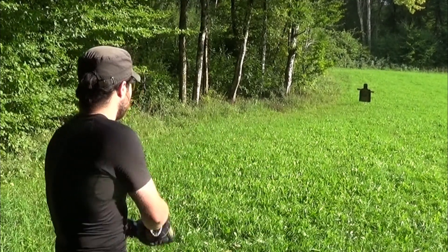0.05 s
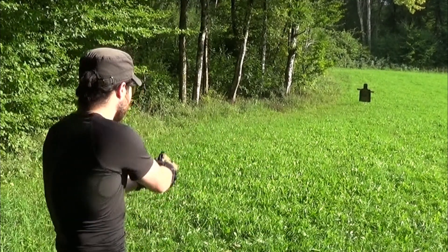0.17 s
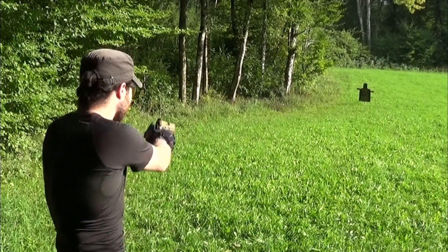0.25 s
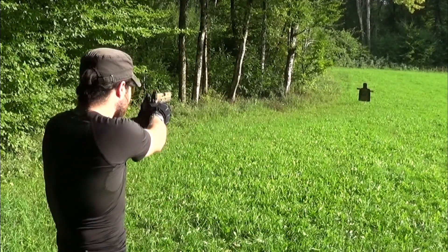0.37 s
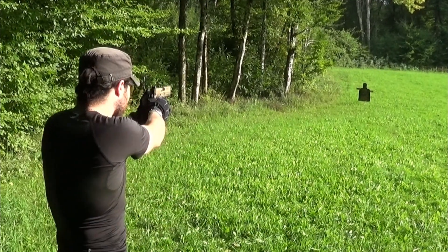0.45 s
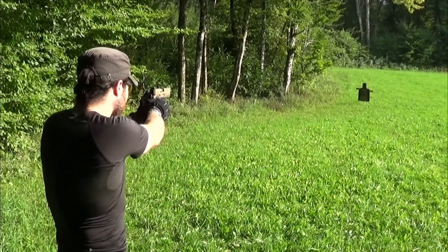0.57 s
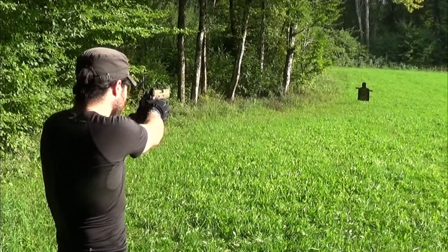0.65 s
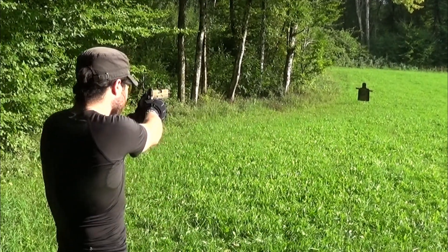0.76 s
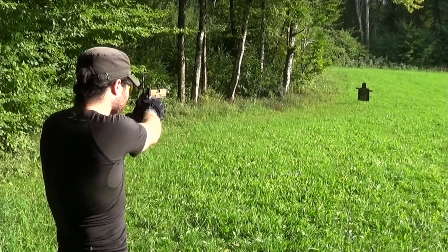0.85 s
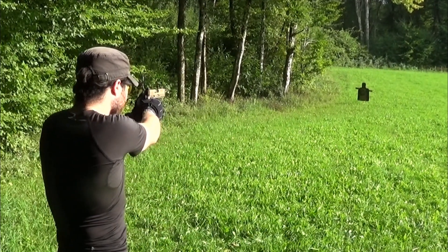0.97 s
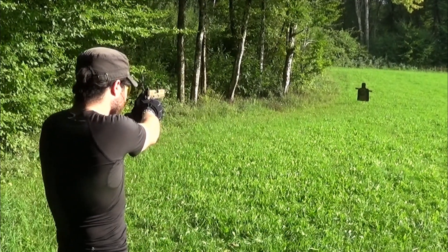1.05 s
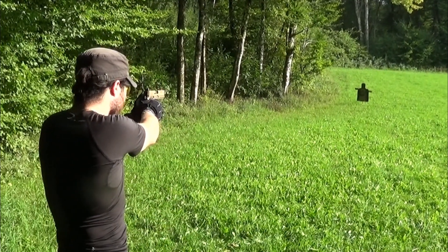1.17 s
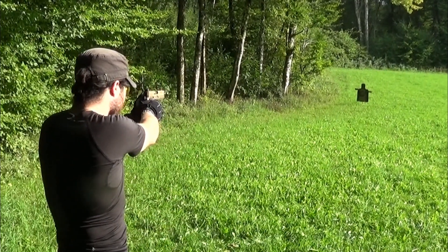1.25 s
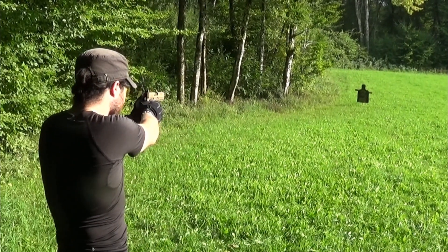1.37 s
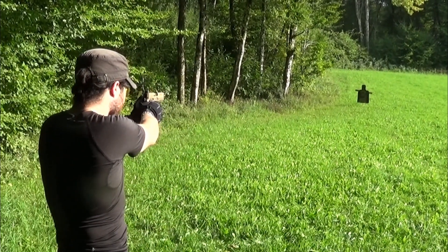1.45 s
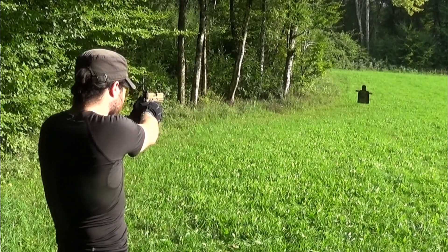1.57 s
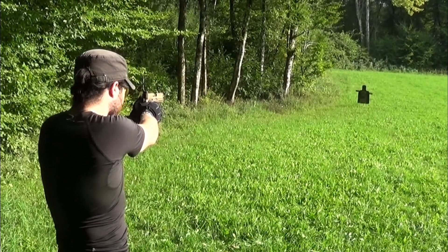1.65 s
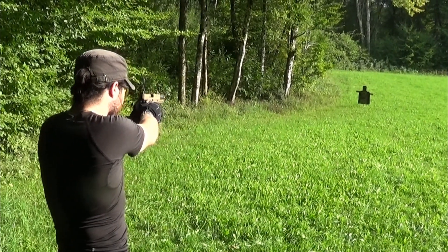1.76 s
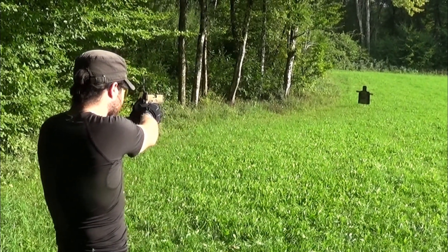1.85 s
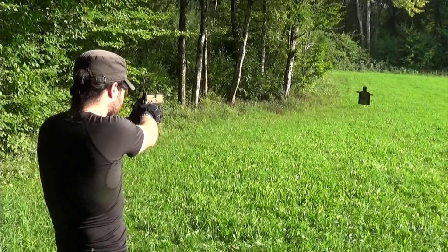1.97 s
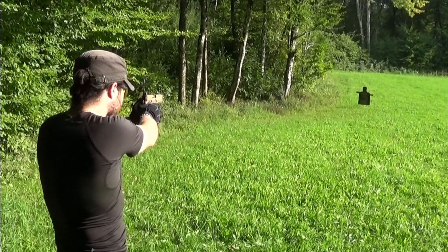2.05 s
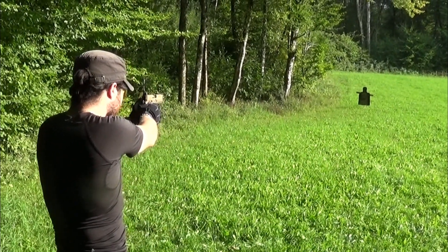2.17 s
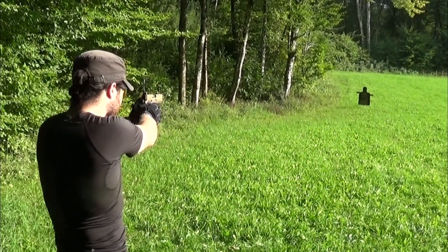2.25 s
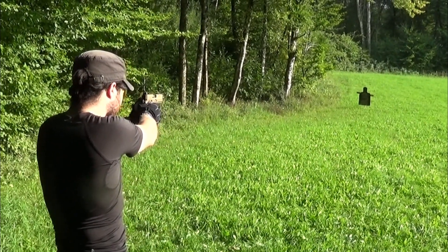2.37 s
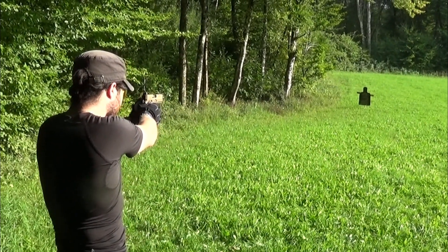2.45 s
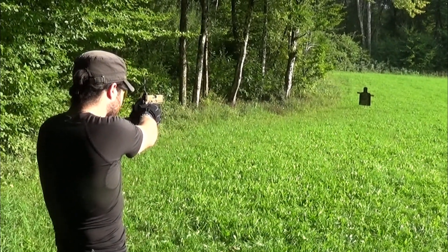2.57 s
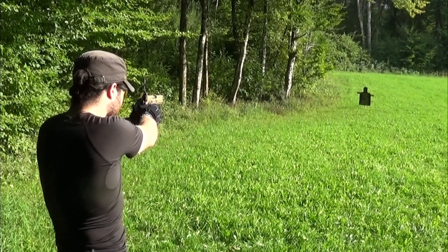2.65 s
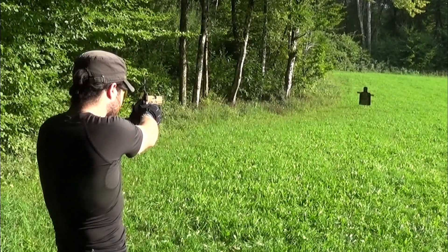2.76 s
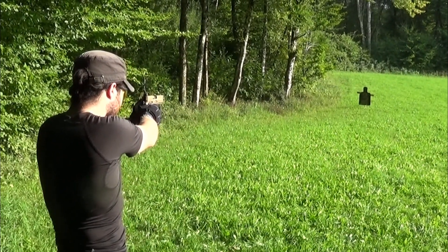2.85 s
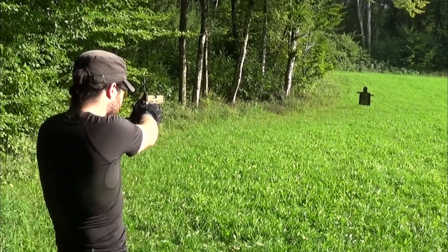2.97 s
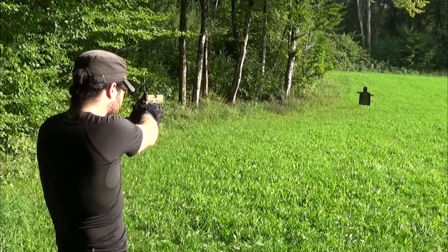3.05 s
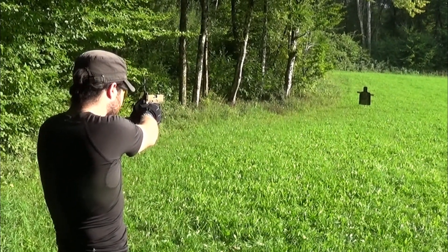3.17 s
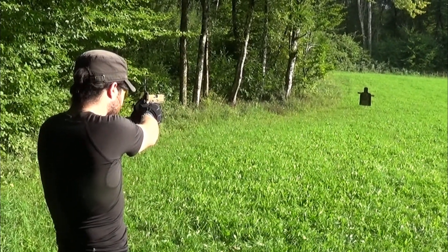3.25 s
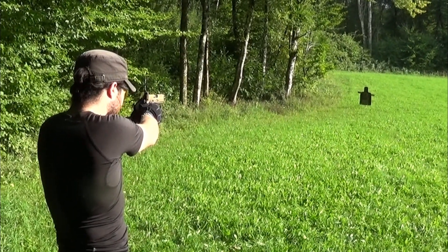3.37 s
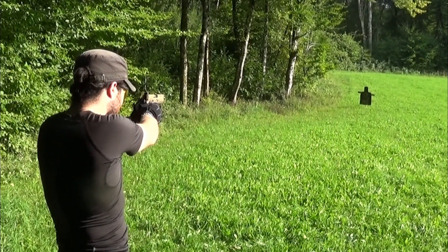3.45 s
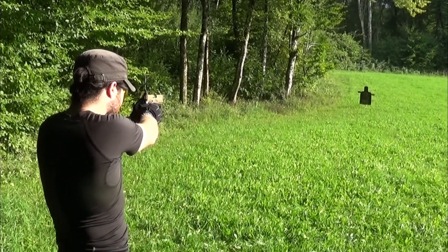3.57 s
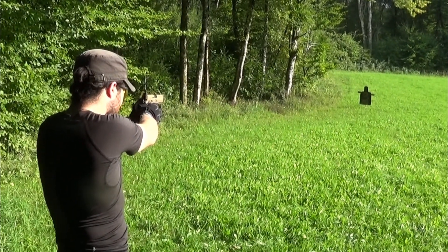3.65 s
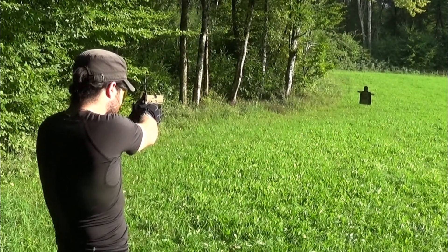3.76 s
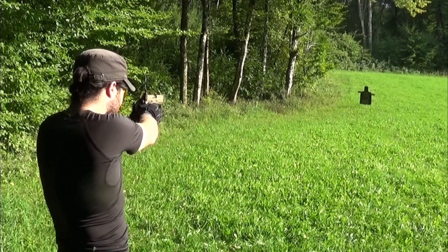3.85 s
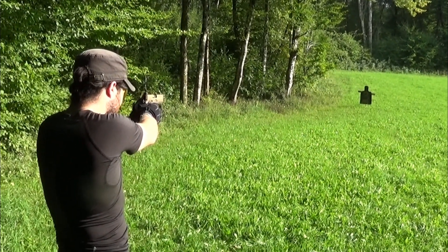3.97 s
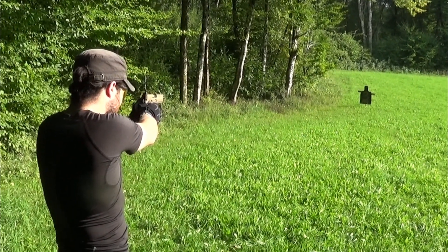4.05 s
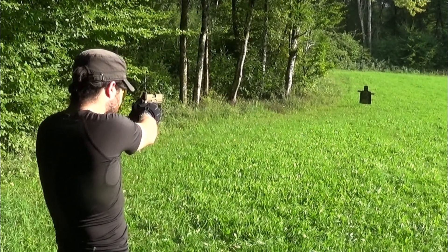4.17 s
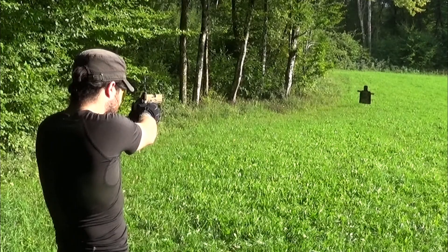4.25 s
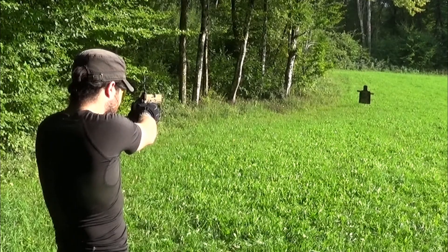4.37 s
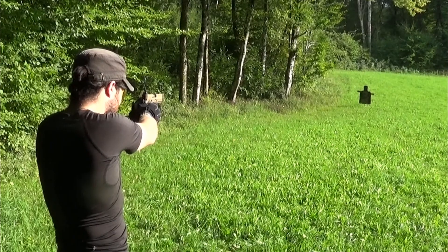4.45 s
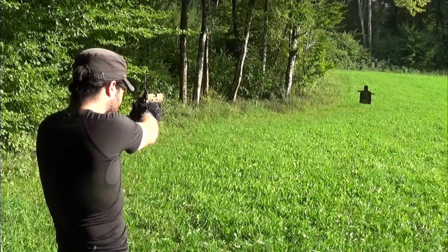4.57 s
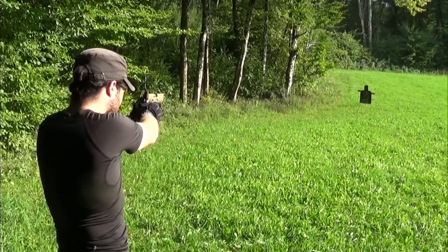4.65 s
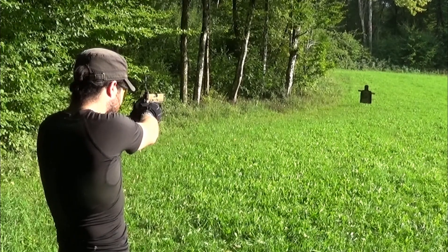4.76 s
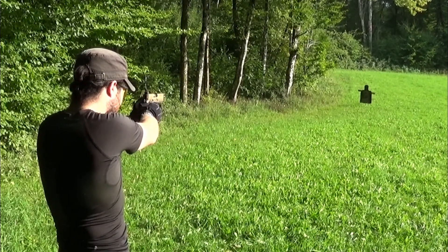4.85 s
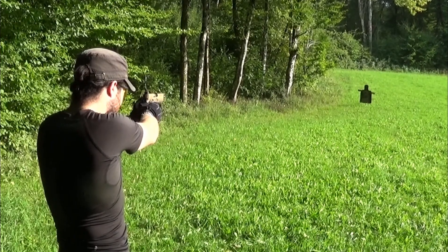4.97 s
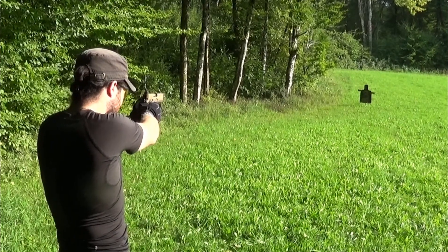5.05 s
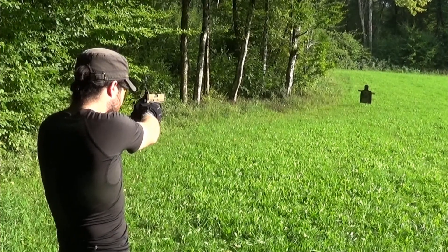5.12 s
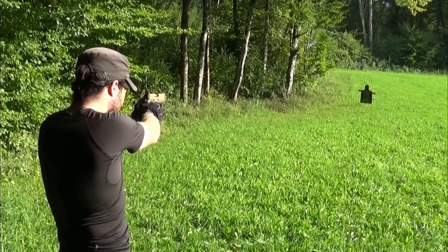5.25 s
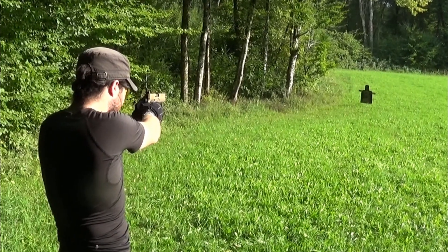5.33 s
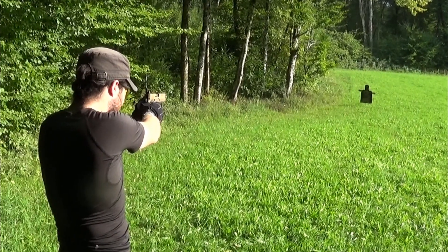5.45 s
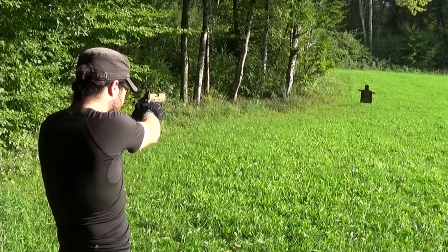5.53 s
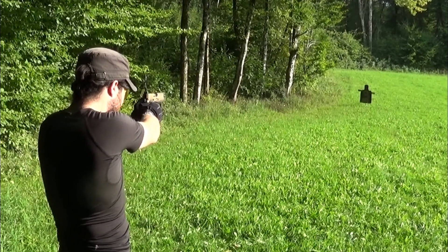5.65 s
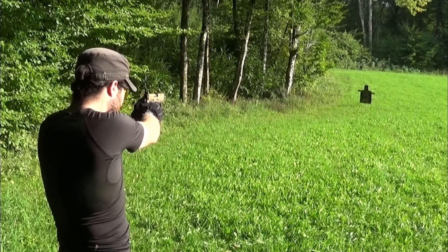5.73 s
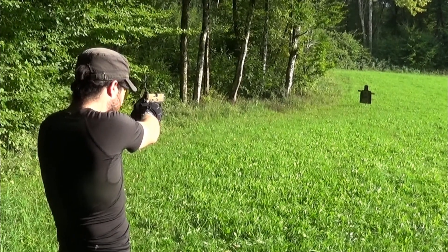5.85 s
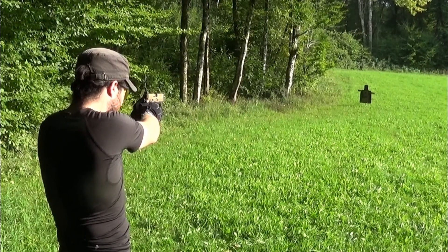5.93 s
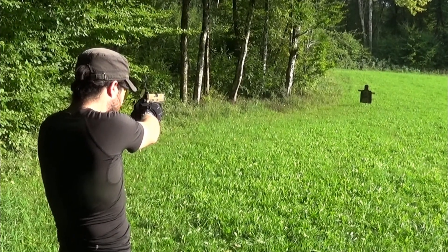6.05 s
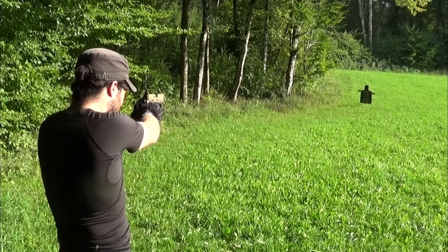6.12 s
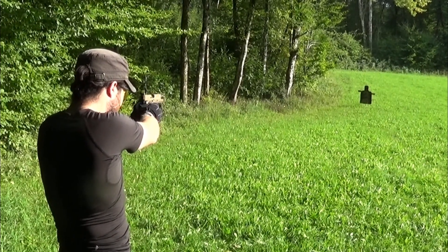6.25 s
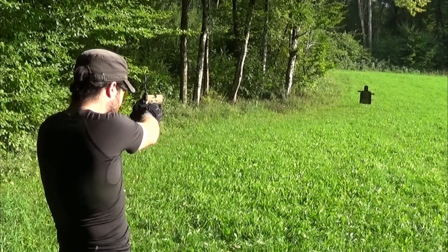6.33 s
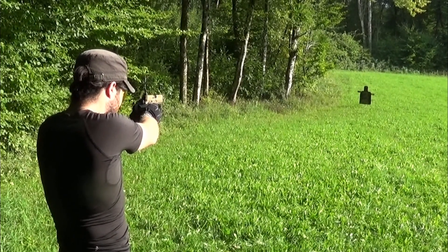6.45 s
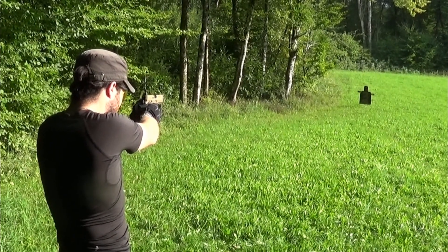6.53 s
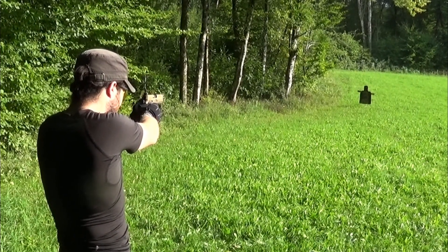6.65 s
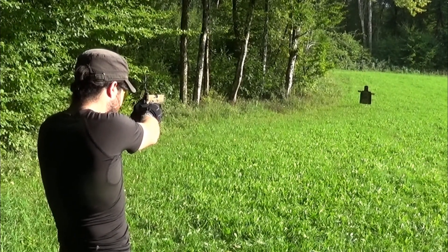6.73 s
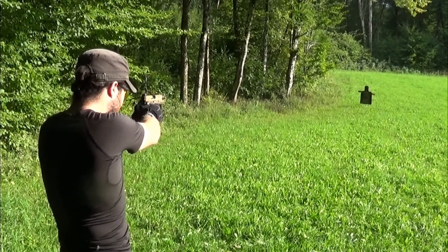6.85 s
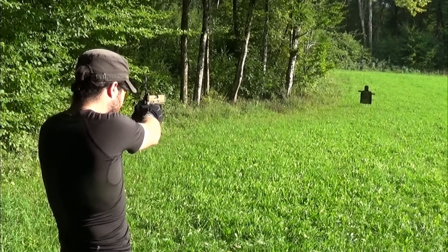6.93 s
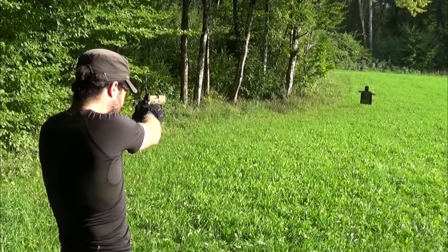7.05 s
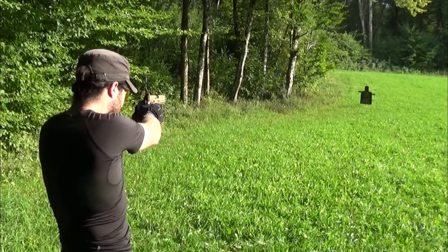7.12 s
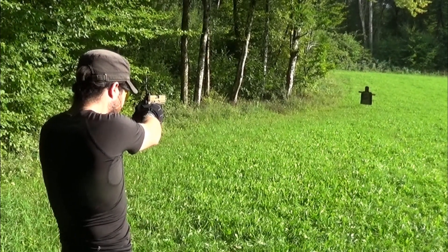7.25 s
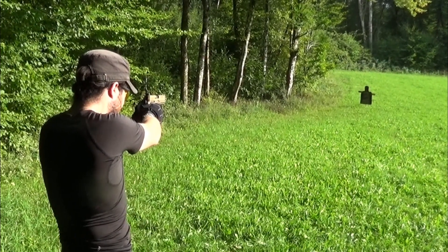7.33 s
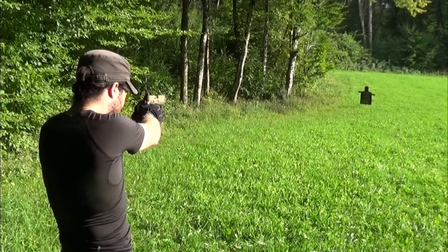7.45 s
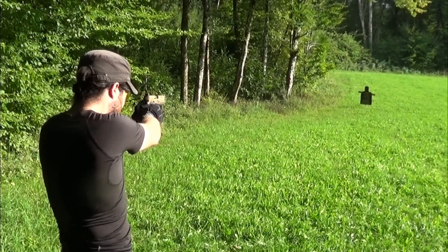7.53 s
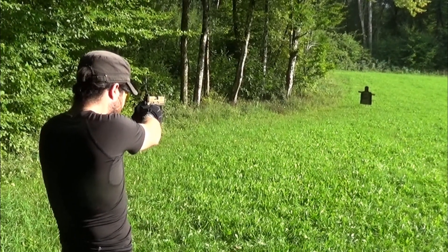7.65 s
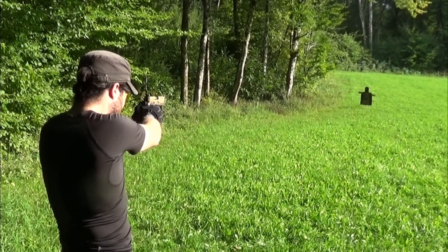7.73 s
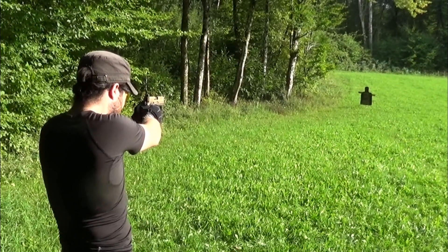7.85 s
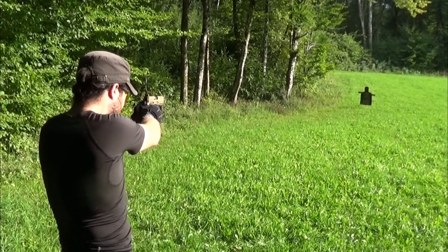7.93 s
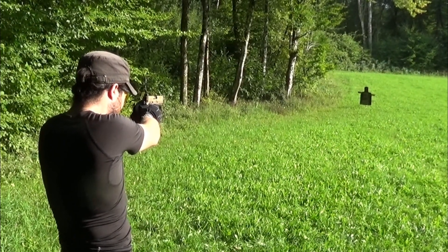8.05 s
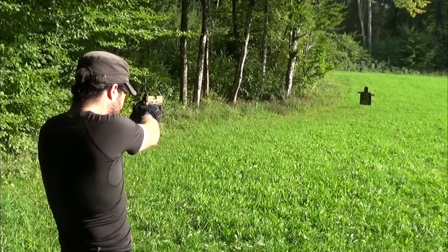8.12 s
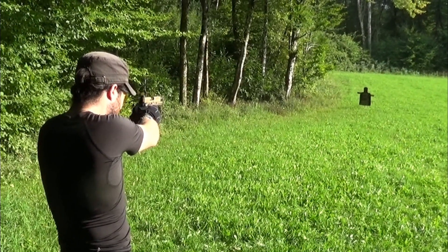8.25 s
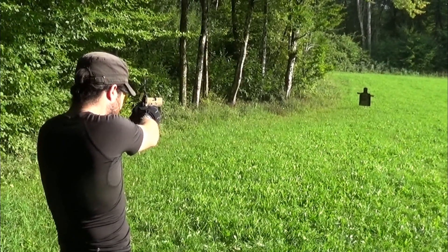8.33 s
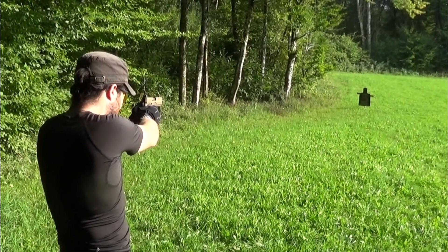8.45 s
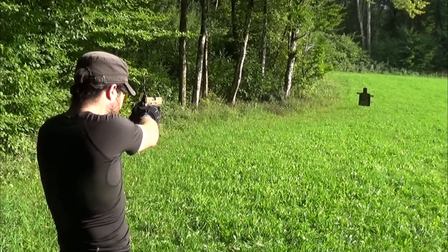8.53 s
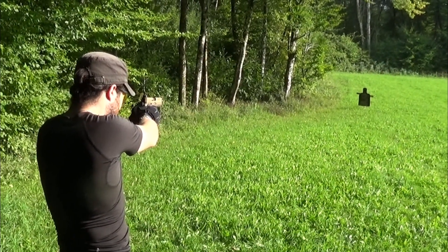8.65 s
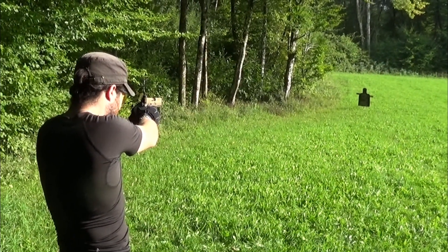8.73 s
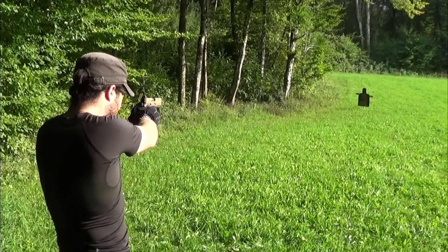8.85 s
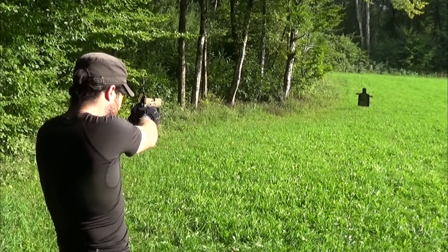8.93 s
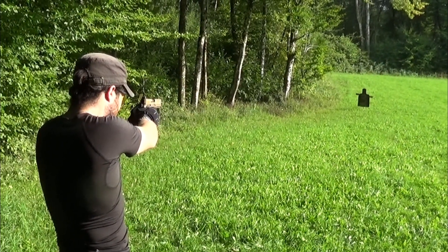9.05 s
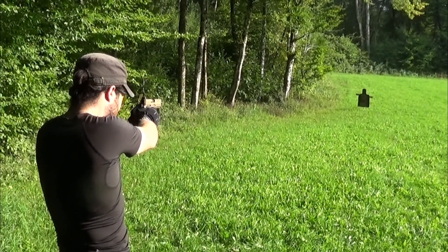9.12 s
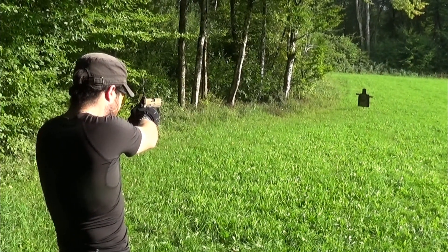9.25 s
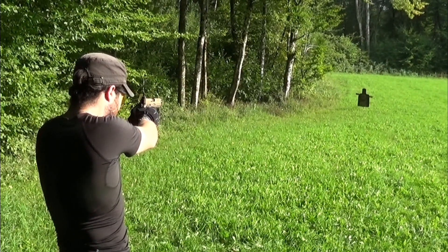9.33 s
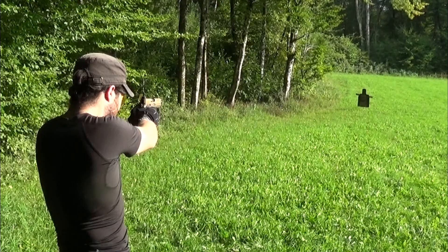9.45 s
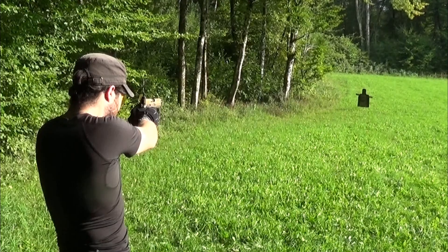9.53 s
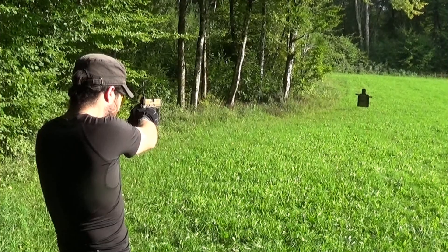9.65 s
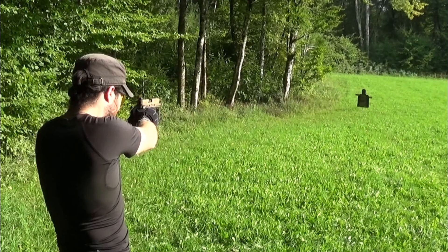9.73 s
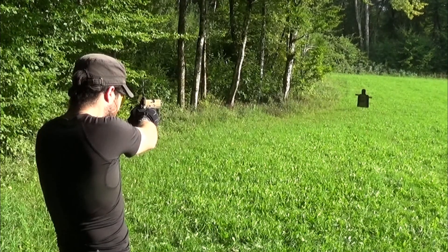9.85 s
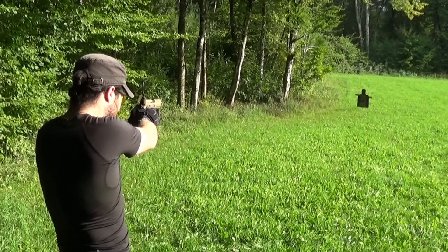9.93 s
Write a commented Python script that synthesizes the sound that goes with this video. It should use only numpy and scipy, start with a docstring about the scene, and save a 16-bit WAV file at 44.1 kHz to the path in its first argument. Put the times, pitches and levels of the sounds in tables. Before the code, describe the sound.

Steady single shots from a gas blowback airsoft pistol pop and echo off trees, with delayed pellet hits on a far target.

```python
"""Airsoft pistol at the edge of a wood

A quiet meadow, with a stereo microphone just behind the shooter. Sleeves brush and small parts click,
then a gas blowback pistol fires twelve times: hammer fall, muzzle crack, puffs and a rush of gas, a
slide that clacks back and slams shut. Nine pellets smack a plate 23.5 m away, each heard about half
a second after its shot. Trunks and leaves throw the shots and hits back."""
import sys
import numpy as np
from scipy import signal
from scipy.fft import rfft, irfft, next_fast_len
from scipy.io import wavfile
from scipy.ndimage import uniform_filter1d

SR = 44100
rng = np.random.default_rng(int(sys.argv[2]) if len(sys.argv) > 2 else 0)


def to_wav(sig):
    """Store sig (one row per channel, or 1-D mono) as 16-bit WAV at the path in sys.argv[1].

    Samples outside -1..1 are clipped; the rate is SR.
    """
    pcm = np.clip(np.atleast_2d(sig), -1, 1) * 32767
    pcm = np.round(pcm).astype(np.int16)
    wavfile.write(sys.argv[1], SR, pcm.T)  # frames by channels


N = 440559
T = np.arange(int(.3 * SR)) / SR  # time axis of one short event, s
TARGET_M, FAR_TREES_M, SOUND_M_S = 23.5, 63, 343  # these set the echo delays
LEAD_S = .012  # head start of the action on the crack


def amp(db):
    """Decibels to gain."""
    return 10 ** (np.asarray(db) / 20)


def tint(x, points):
    """Filter by (Hz, dB) points joined on a log-frequency axis."""
    hz, db = np.transpose(points)
    size = next_fast_len(len(x), True)
    f = np.maximum(np.fft.rfftfreq(size, 1 / SR), 1)
    gain = amp(np.interp(np.log(f), np.log(hz), db))
    return irfft(rfft(x, size) * gain, size)[:len(x)]


def hiss(points, size=len(T)):
    """Coloured noise of rms 1."""
    x = tint(rng.standard_normal(size), points)
    return x / x.std()


def flicker(span, size=N):
    """Random wavering of rms about 1, smoothed over span samples."""
    return uniform_filter1d(rng.standard_normal(size), size=span) * np.sqrt(span)


def fade(t60, t=T):
    """Decay by 60 dB in t60 seconds."""
    return amp(-60 * t / t60)


def add(track, s, x):
    """Mix x into the track from time s on."""
    start = int(round(s * SR))
    part = x[:max(len(track) - start, 0)]
    track[start:start + len(part)] += part


def ring(modes, detune, scatter_db):
    """Struck modes; each blow lands elsewhere and so excites them differently."""
    out = 0
    for (hz, db, t60), (weight, shift, polarity) in zip(modes, rng.standard_normal((len(modes), 3))):
        tone = np.sin(2 * np.pi * hz * (1 + detune * shift) * T)
        out = out + np.sign(polarity) * amp(db + scatter_db * weight) * fade(t60) * tone
    return out


def stereo(mid, side):
    """Left and right from mid and side; the close capsules part mainly the middle frequencies."""
    # stereo width: frequency_hz, side_gain_db
    width = [(60, -20), (250, -10.5), (700, -7.5), (4000, -5.5), (8000, -7.5), (11000, -16.5), (16000, -46)]
    side = tint(side, width)
    return np.array([mid + side, mid - side])


def pan(x, db):
    """Place a sound, left minus right in dB."""
    return x * amp(np.array([[db], [-db]]) / 2)


def air():
    """Faint steady wash of leaves and distance."""
    # spectrum of the meadow: frequency_hz, density_db
    wash = [(15, -31), (25, -18.5), (97, -1.5), (127, -6.5), (260, -4), (1300, -11), (3300, -13.5),
            (3800, -16.5), (11900, -22), (16000, -24.5)]
    return amp(-61) * stereo(hiss(wash, N), hiss(wash, N))


def sleeves():
    """Cloth rubs close to the microphone as the arms come up."""
    # brushes of the sleeves: peak_s, level_db, swell_s (time to rise or fall by 8.7 dB)
    brushes = [(.035, -53, 0.12), (.152, -50, 0.06), (.395, -49, 0.06)]
    # spectrum of cloth: frequency_hz, density_db
    cloth = [(60, -3), (300, -3), (900, -2), (2000, -7), (4500, -7), (7500, -5.5), (9700, 1), (12000, -8),
             (16000, -22)]
    t = np.arange(N) / SR
    power = sum((amp(db) * np.exp(-abs(t - s) / swell_s)) ** 2 for s, db, swell_s in brushes)
    grip = amp(2.1 * flicker(span=100))
    return hiss(cloth, N) * grip * np.sqrt(power)


def handling():
    """Safety, trigger and gear click under the fingers, a lone bright tick follows the first hit, and the wood
    answers faintly."""
    # small clicks: start_s, level_db
    clicks = [(.381, -42), (0.4164, -41.5), (.438, -43), (.472, -48), (.6725, -50.5), (0.9614, -30.5),
              (2.5, -45), (8.151, -47), (8.3024, -38)]
    # spectrum of a click: frequency_hz, density_db
    click_colour = [(300, -22), (1500, -9.5), (5000, -5.5), (9500, 4), (16000, -10.5)]
    out = np.zeros(N)
    for s, db in clicks:
        add(out, s, amp(db) * hiss(click_colour) * fade(0.017))
    return out + wood(out, near_db=-8.5, far_db=-12, build_s=0.0018)


def wood(x, near_db, far_db, build_s):
    """What the trees send back: dense scatter from near leaves, a long dull roll from far trunks."""
    # scatter by band: band_hz, near_level_db, near_t60_s, far_level_db, far_t60_s
    bands = [(100, -16, 0.61, -10, 5.8), (186, -4, .42, -17.5, 2.9), (484, -1.5, 0.78, -9.5, 9.4),
             (930, 1, 0.5, -7.5, 2.54), (2700, -4.5, 0.58, -19, 3.4), (4810, -4.5, 0.47, -22.5, 2.8),
             (6900, -2.5, .41, -21.5, 1.7), (10200, -1, 0.35, -23, 1.03), (14800, -5.5, 0.31, -39.5, .8)]
    t = np.arange(2 * SR) / SR
    log_hz = np.log(np.maximum(np.fft.rfftfreq(len(t), 1 / SR), 1))
    log_centres = np.log(np.array(bands)[:, 0])
    white = rfft(rng.standard_normal((2, len(t))))
    response = 0
    for one_band, (_, near, near_t60, far, far_t60) in zip(np.eye(len(bands)), bands):
        band = irfft(white * np.interp(log_hz, log_centres, one_band))
        early = fade(near_t60, t) * (1 - np.exp(-t / build_s))
        early *= amp(near + near_db) / np.linalg.norm(early)
        late = fade(far_t60, t) * (1 - np.exp(-t / 0.037))
        late *= amp(far + far_db) / np.linalg.norm(late)
        response = response + band * np.hypot(early, late)
    return signal.fftconvolve(x[None], stereo(*response), axes=1)[:, :N]


def knock(chatter, t60, ring_db):
    """Metal on metal: a burst of chatter and the ring of the slide."""
    # modes of slide and frame: pitch_hz, level_db, t60_s
    slide_modes = [(2314, -2.5, 0.079), (2667, -0.5, 0.042), (2730, -6, 0.032), (3415, 0.5, 0.03),
                   (3790, -2.5, 0.082), (6610, -1, .1), (7170, -2, .064), (7600, 3, 0.08), (9580, 3, 0.11),
                   (10600, -8, .04), (14100, -7, .04)]
    burst = hiss(chatter) * fade(t60)
    return burst + amp(ring_db) * ring(slide_modes, detune=0.0086, scatter_db=4.0)


def action():
    """Sear, hammer, valve and slide knock in turn; starts LEAD_S before the crack."""
    # knocks inside the pistol: after_crack_s, level_db, t60_s
    knocks = [(-.0078, -36, .03), (-.0044, -26.5, 0.043), (.0002, -16.5, 0.02), (.004, -17.5, 0.016),
              (0.0109, -15, .035), (.018, -14, 0.016), (.0405, -25, 0.049)]
    # spectrum of their chatter: frequency_hz, density_db
    steel = [(50, -42), (150, -34.5), (600, -12.5), (1500, -8.5), (2700, -2), (4400, -3.5), (7000, -0.5),
             (9500, -5), (12000, -3.5), (13200, -13), (16000, -14.5)]
    out = np.zeros(len(T))
    for delay, db, t60 in knocks:
        add(out, LEAD_S + delay, amp(db) * knock(steel, t60, ring_db=-19.5))
    return out


def muzzle_crack():
    """A bright burst from the barrel, a few milliseconds long."""
    # spectrum of the crack: frequency_hz, density_db
    crack_colour = [(80, -27), (700, -14.5), (1050, -8.5), (1400, -33), (1950, -21.5), (2600, 0),
                    (3600, -2), (4600, -3), (6000, -9), (8000, 0), (12000, -10), (16000, -22)]
    burst = hiss(crack_colour) * fade(0.0073)
    return amp(5) * burst / np.linalg.norm(burst)


def gas(cycle_s):
    """Gas rushes from the open action, weakening, and is pinched off as the slide closes."""
    # spectrum of the rush: frequency_hz, density_db
    rush = [(40, -47), (150, -36), (500, -13), (1400, -15), (2600, 1.5), (4600, -5.5), (6500, -2),
            (9600, 2.5), (12000, -5), (13200, -11.5), (16000, -25)]
    shut_s = cycle_s - .0026  # just before the slide hits the frame
    opening = np.clip(T / .004, 0, 1) * np.clip((shut_s - T) / .006, 0, 1)
    flutter = amp(3.2 * flicker(span=64, size=len(T)))
    sag = amp(-1.5 * T / shut_s)
    return hiss(rush) * opening * flutter * sag


def puff(hz, t60):
    """A short puff of air in one band."""
    band = hiss([(hz / 5, -45), (hz / 1.15, 0), (hz * 1.27, 0), (hz * 4, -36)])
    return band * fade(t60) * np.clip(T * hz / 2, 0, 1)


def off_body(x):
    """The sound plus its dull reflection from the shooter's arms and chest."""
    dulled = tint(x, [(300, -6), (1500, 0), (3000, -4), (6000, -19)])
    out = x.copy()
    add(out, 0.001781, amp(-10) * dulled)
    return out


def slam():
    """The slide hits the frame, rebounds once, and both ring on."""
    # modes of the short clack and the thin ring of the spring: pitch_hz, level_db, t60_s
    clack_modes = [(2399, -7, 0.036), (2763, 1.5, 0.029), (3393, -8.5, 0.062), (6340, -25.5, 0.39),
                   (7450, -15, 0.051), (7580, -29.5, 0.53), (8650, -12, .062)]
    # spectrum of the closing slide: frequency_hz, density_db
    chatter = [(100, -34), (700, -43), (1900, -22), (2700, -7), (3400, 8.5), (4100, -3), (5300, 3),
               (9500, 0), (12000, 0.5), (16000, -15)]
    out = amp(-16) * ring(clack_modes, detune=.004, scatter_db=1.5) * np.clip(T / .002, 0, 1)
    add(out, 0, amp(-13.0) * knock(chatter, 0.029, ring_db=-15.5))
    add(out, .0042, amp(-16.5) * knock(chatter, 0.015, ring_db=-18.5))  # rebound
    return out


def round_trip(metres):
    """Seconds that sound takes there and back."""
    return 2 * metres / SOUND_M_S


def shot_echoes():
    """A thud returns from the edge of the wood, then ticks from the target and the far trees."""
    out = np.zeros(SR)
    add(out, .106, amp(-46.5) * puff(hz=222, t60=.12))
    off_target = amp(-25) * puff(hz=2250, t60=0.021) + amp(-27) * puff(hz=8000, t60=.011)
    add(out, round_trip(TARGET_M), off_target)
    add(out, round_trip(FAR_TREES_M), amp(-41) * puff(hz=2430, t60=0.017))
    return out


def pistol():
    """Twelve blowback cycles close to the microphone, with their echoes and the wood's answer."""
    # shots: crack_s, cycle_s (time until the slide slams shut)
    shots = [(1.8896, 0.06), (2.8325, 0.055), (3.718, 0.068), (4.4411, 0.062), (5.1202, .0633),
             (5.7386, 0.066), (6.3606, 0.063), (6.9613, 0.064), (7.6783, .0647), (8.3554, 0.06),
             (9.0989, 0.065), (9.833, 0.067)]
    # dull puffs as the barrel empties and the breech vents: after_crack_s, level_db, centre_hz, t60_s
    vents = [(.001, -30.5, 192, 0.082), (.0095, -30.5, 255, 0.042), (.0099, -18, 654, 0.02),
             (.017, -27, 1400, .023), (.04, -35.5, 250, .05), (.047, -24, 1150, .04)]
    gun, slams, puffs, echoes = np.zeros((4, N))
    crack = muzzle_crack()  # the same barrel gives the same crack every time
    usual_knocks = action()  # the knocks are partly alike from shot to shot
    for s, cycle_s in shots:
        add(gun, s, crack)
        add(gun, s - LEAD_S, amp(-0.4) * (.5 * usual_knocks + 0.85 * action()))
        add(gun, s, amp(-22) * gas(cycle_s))
        add(slams, s + cycle_s, amp(-.5) * slam())
        add(echoes, s, shot_echoes())
        for delay, db, hz, t60 in vents:
            add(puffs, s + delay, amp(db) * puff(hz, t60))
    gun = off_body(gun)
    # gas and chatter leave on all sides, so the two capsules hear them a little apart
    near = gun + slams
    close = stereo(near, amp(-12.0) * near * flicker(span=60))
    outward = gun + amp(-3.5) * slams  # the slide faces backwards: less slam reaches the trees
    trees = wood(outward, near_db=-6.5, far_db=-5, build_s=0.0079)
    for _ in range(2):  # two more stands of trees, whose swaying leaves blur the ring
        trees += wood(outward * flicker(span=200), near_db=-5.0, far_db=-5.5, build_s=0.012)
    return pan(close + off_body(puffs) + echoes + trees, db=.5)


def target():
    """Across the meadow each pellet dents the plate, which rings and buzzes; the wood answers."""
    # pellet hits: start_s, level_db, dent_pitch_hz, ring_db
    pellets = [(2.3627, -7, 2530, -2), (3.3074, -4.5, 1870, -3), (4.1901, -6, 2620, -3.5),
               (4.9144, -9.5, 2450, -2), (5.5944, -4, 2020, -5), (6.2156, -4.5, 2295, -5.5),
               (7.4389, -5, 1840, -1), (8.8334, -5.5, 2050, -4.5), (9.579, -4.5, 3570, -33)]
    # modes of the plate: pitch_hz, level_db, t60_s
    plate_modes = [(176, -18, 0.095), (260, -11.5, 0.028), (637, -10.5, 0.04), (1072, 3, 0.023),
                   (1370, -6.5, 0.017), (1730, 3.5, 0.021), (2090, -4, 0.014), (3220, -2.5, 0.0059),
                   (3700, -38, 0.013)]
    # spectrum of a hit: frequency_hz, density_db
    smack = [(60, -19), (170, 2), (280, -1.5), (420, -13.5), (650, -2), (1050, -2.5), (1900, 3),
             (4000, 0.5), (7000, -9), (10000, -16), (15000, -27.5)]
    direct, blows, far_echo = np.zeros((3, N))
    behind_s = round_trip(FAR_TREES_M - TARGET_M)  # to the trees behind the target and back
    for s, db, hz, ring_db in pellets:
        dent = np.cos(2 * np.pi * hz * T) * fade(0.0024) * (1 - np.exp(-T / .00005))
        plate = amp(ring_db - 11.5) * ring(plate_modes, detune=0.046, scatter_db=0.0)
        buzz = amp(-17) * hiss(smack) * fade(0.039)
        add(direct, s, amp(db) * (amp(2.5) * dent + plate + buzz))
        add(blows, s, amp([db + 0.12 * ring_db]))  # one impulse a hit
        add(far_echo, s + behind_s, amp(db - 39) * puff(hz=2100, t60=0.04))
    direct = tint(direct, [(50, -6), (200, -6.5), (1000, -3), (10000, 4.0), (15000, -7)])
    # the trees hear the plate from all sides, which evens out its modes
    spread = amp(14.5) * tint(blows, smack)
    return pan(direct + far_echo, db=-2.0) + wood(spread, near_db=-0.5, far_db=2.5, build_s=0.0057)


def scene():
    """Everything at the microphone, just behind the shooter."""
    return pistol() + target() + sleeves() + handling() + air()


def record(dry):
    """The microphone chain sheds deep bass, rounds the highest peaks and cuts the top."""
    low_cut_hz, top_hz, ceiling = 40, 15800, .85
    trimmed = signal.sosfilt(signal.butter(1, low_cut_hz, "high", fs=SR, output="sos"), dry)
    rounded = ceiling * np.tanh(trimmed / ceiling)
    return signal.sosfilt(signal.ellip(10, .2, 70, top_hz, fs=SR, output="sos"), rounded)


dry = scene()
out = record(dry)
to_wav(out)
```